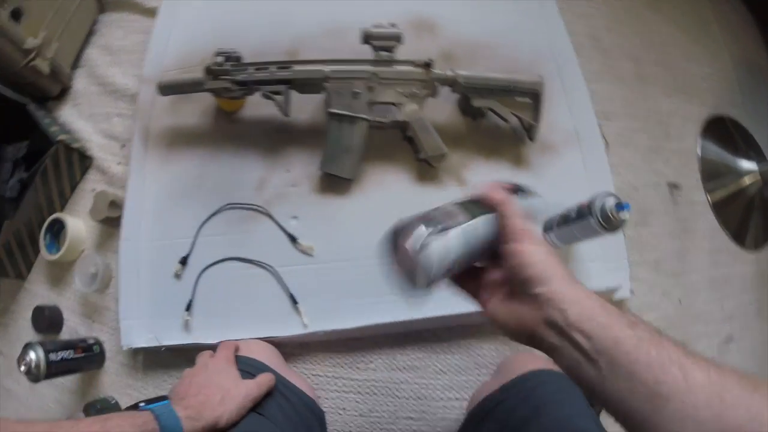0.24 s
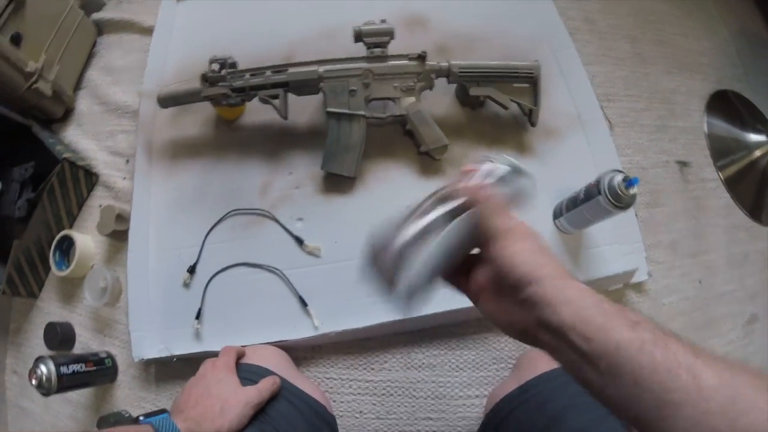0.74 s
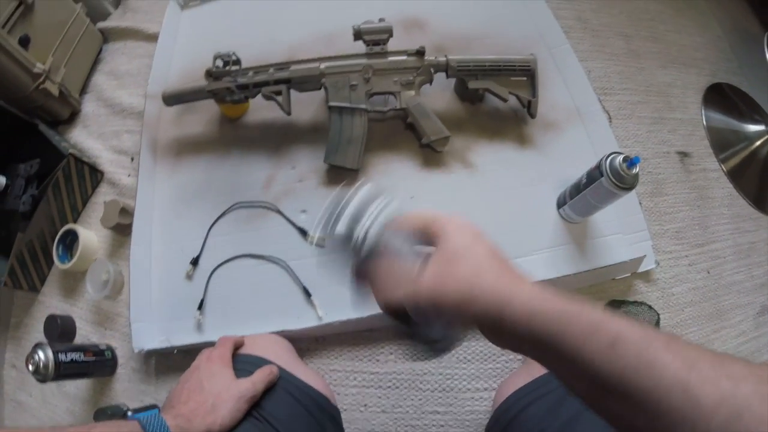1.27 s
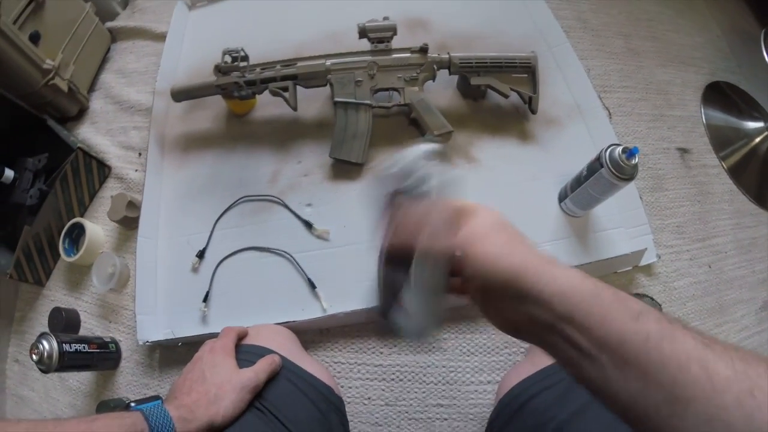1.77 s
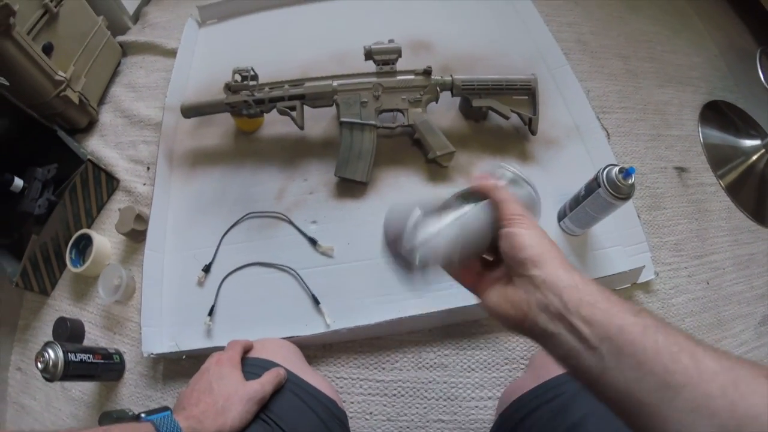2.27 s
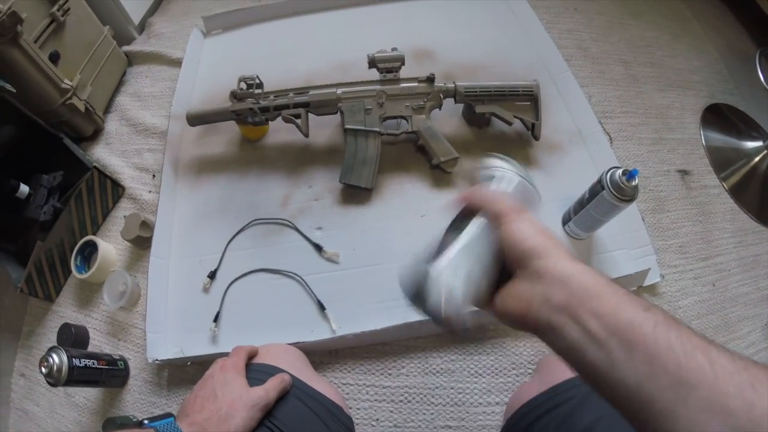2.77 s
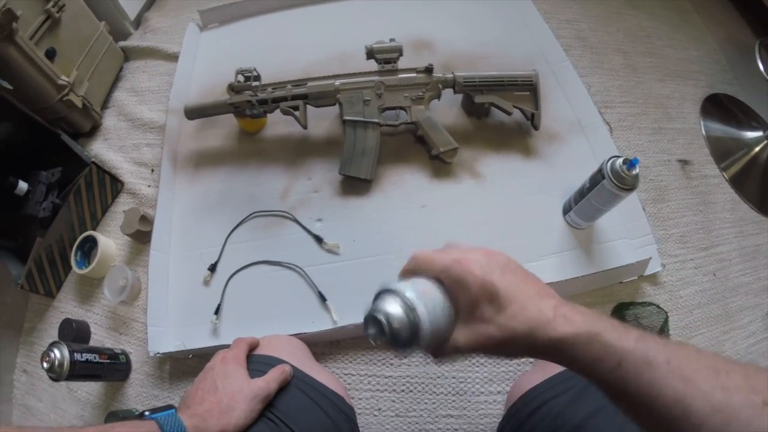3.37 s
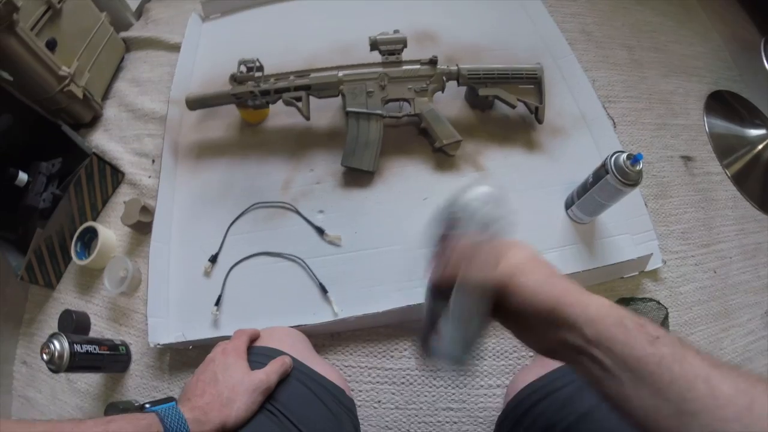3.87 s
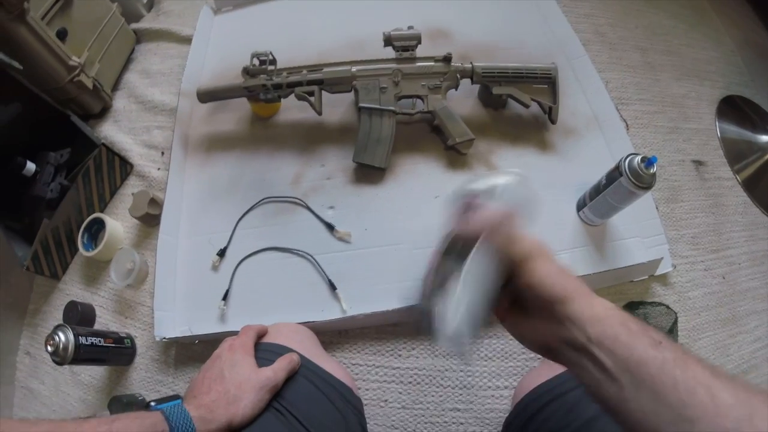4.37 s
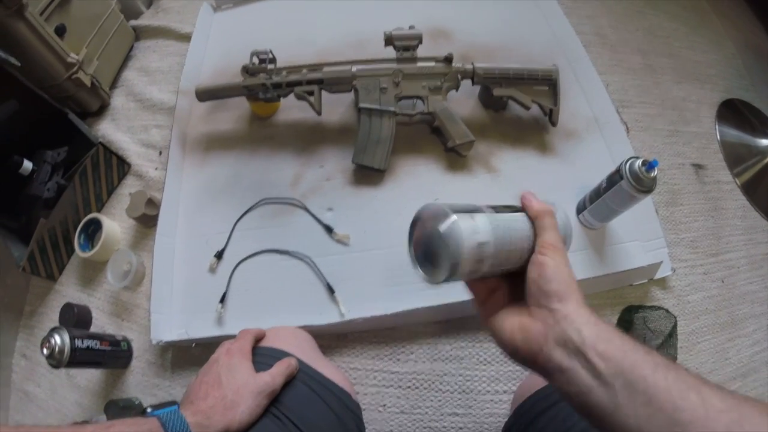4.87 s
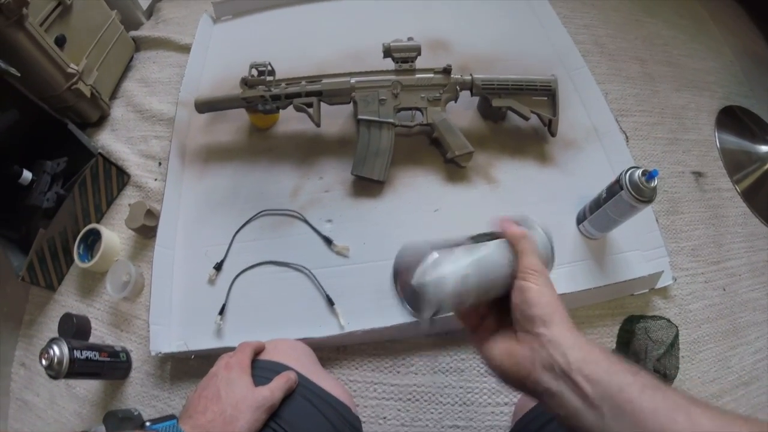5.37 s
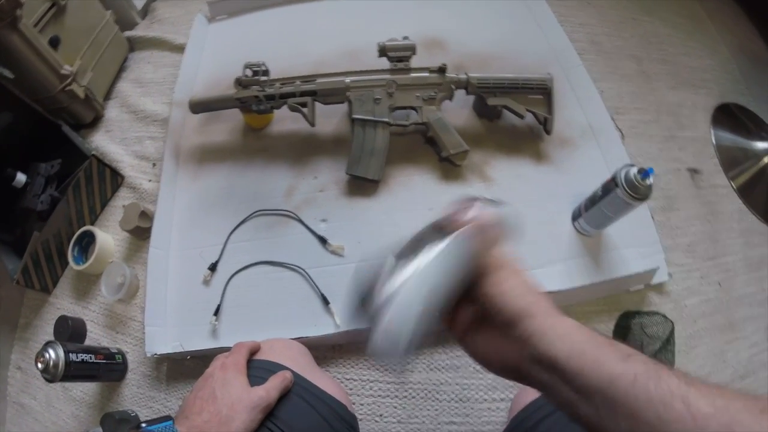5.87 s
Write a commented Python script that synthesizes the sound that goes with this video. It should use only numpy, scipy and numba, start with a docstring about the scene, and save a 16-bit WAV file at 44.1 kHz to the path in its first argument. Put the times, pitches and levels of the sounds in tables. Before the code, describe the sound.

A half-full spray can is shaken hard by hand in a carpeted room, an arm's length from a small camera microphone, both channels the same. Throughout, a mixing ball strikes thin steel with short, dry metallic knocks, while paint sloshes and fizzes softly between them. It opens with a quick cluster, a brief gap from about 0.2 to 0.45 seconds, then a busy mix of hollow tocks and bright clacks. From about 1.2 to 3.5 seconds the rattle is nearly continuous, dense and hard, mostly high and wall-like. From 3.6 it thins; between 4 and 5 come separate sharp clacks with lower little bounces after them. A short pause, with only slosh, falls around 5.1 to 5.3, then hollower, lower knocks return, thickening from 5.75 to the end just past 6 seconds. Short, dull room tails and faint hush remain beneath, with little bass.

```python
"""In a carpeted room, a half-full spray can is shaken hard by hand, an arm's length from a small camera.
The mixing ball knocks on the steel: bursts of decaying modes, damped within milliseconds by hand and paint.
Paint sloshes and fizzes between knocks: drops and froth noise pushed through the can's modes.
The room adds short noise tails and a faint hush. One microphone feeds both channels."""
import sys
import numpy as np
from scipy import signal
from scipy.fft import rfft, irfft
from scipy.io import wavfile
from scipy.ndimage import uniform_filter1d
from numba import njit

SR = 44100
rng = np.random.default_rng(int(sys.argv[2]) if len(sys.argv) > 2 else 0)


def dump(signal):
    """Clip the signal to [-1, 1] and save it as 16-bit WAV at the path in sys.argv[1]."""
    limited = np.clip(np.atleast_2d(signal).T, -1, 1)
    pcm = np.round(limited * 32767).astype(np.int16)
    wavfile.write(sys.argv[1], SR, pcm)


N = 270774


def undb(db):
    """Decibels to amplitude gain."""
    return 10 ** (np.asarray(db) / 20)


def level(x, db):
    """Set the RMS level in dB."""
    return x * undb(db) / np.sqrt(np.mean(x ** 2))


def decay_60(t, t60):
    """Exponential decay, falling 60 dB in t60 seconds."""
    return np.exp(-np.log(1000) * t / t60)


def soft_start(t, rise_s):
    """Smooth swell from 0 to 1."""
    return 1 - np.exp(-(t / rise_s) ** 2)


def resonate(x, hz, width_hz):
    """Two-pole band-pass, gain 1 at the centre."""
    return signal.lfilter(*signal.iirpeak(hz, hz / width_hz, fs=SR), x)


def walk(rate):
    """Random levels held 1 / rate s and slewed twice; spread near 1."""
    hold = int(SR / rate)
    steps = np.repeat(rng.standard_normal(N // hold + 1), hold)
    return 2.04 * uniform_filter1d(uniform_filter1d(steps, hold), hold)[:N]


# How body, dome, wall, rim and tick follow a move toward the end, and a hard strike.
# One column per part: level change/dB per dB
FOLLOWS_END = [0.87, 0.97, -0.0076, -0.079, 0.24]
FOLLOWS_HARD = [0.025, 0.0013, -0.0081, 0.73, 1.06]


def shares(level_db, end_db, hard_db, part_db):
    """Share a level among the five parts of the can, in dB; their powers add up to that level."""
    db = np.array(part_db) + np.outer(end_db, FOLLOWS_END) + np.outer(hard_db, FOLLOWS_HARD)
    total_db = 10 * np.log10(np.sum(undb(db) ** 2, axis=1))
    return db + (level_db - total_db)[:, None]


# Spectrum of the room's hush, before its overall level is set.
# Columns: f/Hz, relative level/dB
HUSH_SPECTRUM = [(59, -62), (100, -18.5), (166, 2), (358, -27), (558, -5), (784, -33), (1580, -12.5),
                 (14400, -37), (16000, -50)]


def room_tone():
    """A faint steady hush: white noise shaped by a smooth spectrum."""
    hz, db = np.transpose(HUSH_SPECTRUM)
    f = np.maximum(np.fft.rfftfreq(N, 1 / SR), 1)
    gain = undb(np.interp(np.log(f), np.log(hz), db))
    return level(irfft(rfft(rng.standard_normal(N)) * gain, N), -50)


# Paint running along the can.
# Columns: t/s, wash level/dB, toward the end: dome over wall level/dB, spray: rim over wall level/dB
SLOSH = [(0, -34.5, 2, 7), (.12, -37, 3, -3), (.26, -31, -0.5, -2.5), (.45, -40, 3, 7),
         (.63, -29.5, 4.5, 3), (.85, -42.5, 5, 5), (1.02, -29.5, -5, -1), (1.13, -54, 2, 3),
         (1.4, -31, -9, -1), (1.74, -39.5, -2, -7), (2.2, -43.5, -6, 1), (2.7, -34, -8, -7),
         (3.2, -33.5, -12, -10), (3.45, -27, -13, -7), (3.6, -49, -9, -3), (3.78, -43, -2, -3),
         (3.93, -54, -6, 0), (4.3, -35, 4, 3.5), (4.9, -34.5, -0.5, 4.5), (5.15, -32.5, 0.5, 4),
         (5.25, -48, 3, 4), (5.58, -31.5, -3, 3), (5.8, -39, -1, 0), (6.14, -43, 12, 0)]
# Balance of the running wash; splash level under its knock.
# One column per part (body, dome, wall, rim, tick): level/dB
WASH_BALANCE = [-12.5, -0.5, -1.5, -9, -22]
SPLASH_UNDER_KNOCK = [-37.5, -36, -28.5, -31.5, -32.5]
SPLASH_RISE_S, SPLASH_T60_S = 0.026, 0.37


def stirring():
    """Gain of the paint on each part: the running wash plus the splash that follows every knock."""
    t = np.arange(N) / SR
    s, *columns = np.transpose(SLOSH)
    wash_db = shares(*(np.interp(t, s, c) for c in columns), WASH_BALANCE)
    wash_power = undb(wash_db.T) ** 2

    s, strength, end, hard, _ = np.transpose(KNOCKS)
    kick_db = shares(strength, end, hard, KNOCK_BALANCE) + SPLASH_UNDER_KNOCK
    kicks = np.zeros((len(CAN), N))
    kicks[:, np.clip(s * SR, 0, N - 1).astype(int)] = undb(kick_db.T) ** 2

    t = t[:SR // 2]
    # power falls 60 dB in the splash's t60
    splash = soft_start(t, SPLASH_RISE_S) * undb(-120 * t / SPLASH_T60_S)
    splash_power = np.abs(signal.fftconvolve(kicks, splash[None], axes=1)[:, :N])
    return np.sqrt(wash_power + splash_power)


# What the can rings with: one list of modes each for body, dome, wall, rim and tick.
# Columns: f/Hz, relative level within the part/dB, t60/s of the lingering ring
CAN = [
    [(252, 6, 0.0097), (397, 7.5, 0.011), (715, -3, 0.0031)],
    [(1017, -3, 0.011), (1400, -1, 0.012), (1625, -3.5, 0.024), (1865, -1, 0.019), (2168, -1, 0.017)],
    [(2723, 1.5, 0.0048), (3117, -1, 0.011), (3531, -0.5, 0.013), (4086, -0.5, 0.012), (4513, -1.5, 0.013)],
    [(5186, 5, 0.013), (6160, 6.5, 0.011), (6670, -4, 0.015), (7330, -4, 0.0083)],
    [(8310, -1, 0.0062), (9150, -1.5, 0.01), (10480, 0, 0.013), (11230, -20, 0.01), (12200, -6, .004),
     (13700, -7, 0.0028)],
]


def paint(drop_spread_db=3.0, hiss=0.69, wet_damping=4.66):
    """Drops and light scuffs of the ball tap the wall over a hiss of froth, through the can's modes."""
    drops_per_s, biggest_db, surge_db, patchy_db = 350, 10, 1.2, 2.5
    size_db = np.minimum(drop_spread_db * rng.exponential(size=N), biggest_db)
    falls = rng.random(N) < drops_per_s / SR
    drops = falls * undb(size_db) * np.sign(rng.standard_normal(N))
    surge = undb(surge_db * walk(59))
    out = 0
    for part, gain in zip(CAN, stirring()):
        push = level(drops, 0) + hiss * rng.standard_normal(N)
        wet = 0
        for f, db, t60 in part:
            # the moving paint muffles now one mode, now another
            patchy_gain = undb(db + patchy_db * walk(60))
            # wet steel rings shorter, so the bands are wider
            band = resonate(resonate(push, f, wet_damping / t60), f, 2 * wet_damping / t60)
            wet = wet + patchy_gain * band
        out = out + level(wet, 0) * gain * surge
    return out


# A blow favours the modes near its own pitch and pulls them toward it
FAVOUR_DB, FAVOUR_OCTAVES, PULL = 8.5, 0.21, 0.71


def ring(modes, chance, blow_hz, rise_s=0.00022, spread_s=.00012, linger=0.61):
    """One row per blow: the decaying modes of one part, struck at a new spot, peak 1."""
    hz, db, t60 = np.transpose(modes)[:, None, :, None]
    pitch, size, lag = (chance[:, k, :len(modes), None] for k in range(3))
    detune, scatter_db, snap_t60_s = .03, 2.5, .0055
    octaves = np.log2(blow_hz[:, None, None] / hz)
    near = np.exp(-(octaves / FAVOUR_OCTAVES) ** 2)
    hz = hz * 2 ** (PULL * near * octaves)
    hz = hz * (1 + detune * (1 - near) * pitch)
    db = db + FAVOUR_DB * near + scatter_db * size
    # the bending wave reaches each radiating patch a moment later
    t = np.maximum(np.arange(2048) / SR - spread_s * (1 - near) * np.abs(lag), 0)
    # most energy leaves in a snap around the contact; a share lingers in the shell
    decay = decay_60(t, snap_t60_s) + linger * decay_60(t, t60)
    # the favoured modes all start in the same direction
    direction = np.where(near > 1 / 4, 1, np.sign(lag))
    wave = direction * np.sin(2 * np.pi * hz * t) * decay
    sound = np.sum(undb(db) * wave * soft_start(t, rise_s), axis=1)
    return sound / np.max(np.abs(sound), axis=1, keepdims=True)


# Knocks of the mixing ball.
# Columns: t/s, strength level/dB, toward the end: dome over wall level/dB,
# hardness: rim over wall level/dB, favoured pitch f/Hz
KNOCKS = [(0.0515, -3, -6.5, -8, 3910), (0.076, -11.5, 0.5, 4, 4630), (0.0896, -14.5, -6, -7, 4670),
          (0.1443, -13, -2.5, -6, 3340), (0.163, -18.5, 5, -3, 1490), (0.4558, -0.5, -11, -2, 3000),
          (0.489, -29, 12, -3, 1530), (0.529, -6, 10, -2, 1710), (0.5486, -9, -1, -16, 1390),
          (0.5939, -4.5, -10.5, -8.5, 3850), (0.658, -12.5, -10, -22, 3350), (0.7044, -3.5, -6, -4.5, 1730),
          (0.708, -7, 9, 25, 2000), (0.7304, -7, 1, 3, 1730), (0.7521, -8, 1, -4, 4600),
          (0.7607, -7, -2, -15, 3390), (0.7755, -11.5, 4, -1, 1650), (0.8374, -7.5, 12, -5, 1820),
          (0.8487, -10, 6, -7, 1560), (0.8558, -17, 3, -5, 2050), (0.887, -5.5, -2, 2, 4550),
          (0.9021, -4, -0.5, -10, 4100), (0.979, -6.5, 1.5, -2, 4590), (1.0019, -2.5, -4, -10, 3500),
          (1.0059, -7.5, 9, 7.5, 1880), (1.0333, -6, 6, -9, 1980), (1.142, -13, 1.5, -11, 2120),
          (1.179, -3.5, -1.5, -4.5, 3230), (1.1872, -10.5, -6, -15, 2470), (1.2104, -9, -14, -12, 3250),
          (1.2185, -9.5, -15, -21, 3650), (1.2283, -1, -5.5, -7, 3460), (1.248, -5.5, -18, -22, 3570),
          (1.2703, -4, -13, -9, 3970), (1.2885, -3.5, -22, -13, 3550), (1.292, -5, -27, -16, 3320),
          (1.303, -11, -17, -11, 3300), (1.3111, -12, -15, -18, 3800), (1.335, -7.5, -12, -18, 2430),
          (1.343, -9, -16, -23, 3660), (1.3487, -10, -11, -20, 3800), (1.38, -8.5, -22, -9, 3400),
          (1.3931, -4.5, -11.5, -15, 3540), (1.4018, -3, -13, -22, 3400), (1.4424, -13, -6, -9, 3540),
          (1.451, -6.5, -7, -9, 3630), (1.4723, -9.5, 9, -9, 960), (1.4925, -15, 9, -10, 2080),
          (1.5153, -1, -19, -5.5, 3550), (1.5304, -4.5, -28, -26, 3870), (1.5376, -12, -9, -7, 3180),
          (1.5413, -7.5, -20, -8, 2820), (1.5833, -7, -20, -15, 3890), (1.5898, -4.5, -14.5, -13, 3380),
          (1.6439, -6, -13, -19, 3430), (1.6681, -7, -8, -12, 3510), (1.6896, -12, 11, -3, 1010),
          (1.7027, -12.5, 0, -6, 2020), (1.7096, -15, 3, -10, 1970), (1.7727, -2, -19.5, -11, 3460),
          (1.7768, -3, -12, -10.5, 3160), (1.7988, -7.5, -28, -10, 4520), (1.804, -9.5, -32, -11, 3440),
          (1.8391, -5, -15, -25, 4560), (1.8517, -12, -21, -15, 4560), (1.857, -8.5, -12, -22, 3450),
          (1.9029, -5, -11, -10, 3470), (1.9547, -6, -3.5, -6.5, 2870), (1.9985, -11.5, 3, -14, 2200),
          (2.0488, 1.5, -18, -9, 3100), (2.069, -20, -8, 3, 2590), (2.1233, -3, -14.5, -14, 3380),
          (2.1433, -5.5, -8.5, -17, 3630), (2.1656, -11.5, 0, -9, 970), (2.1798, -13.5, 0, -10, 1830),
          (2.2433, -8.5, 3, 0, 2800), (2.2583, -1.5, -24, -5.5, 3230), (2.2817, -4.5, -14.5, -15, 3070),
          (2.2895, -2, -17.5, -8, 3180), (2.3141, -12, -7.5, -7, 3170), (2.3373, -9.5, -14, -6, 3630),
          (2.3497, -10, -18, -16, 3540), (2.3538, -4.5, -11.5, -19, 3380), (2.3719, -9.5, -12, -25, 3750),
          (2.4179, -3, -0.5, -15, 3020), (2.4618, -2.5, -9, -18, 2640), (2.47, -7, -13, -21, 3400),
          (2.4807, -2, -22, -14, 3100), (2.4917, -14, -19, -18, 3060), (2.511, -6, -17, -13, 3060),
          (2.5217, -10, -13, -13, 2160), (2.5265, -11, -21, -11, 2870), (2.5342, -14, 0, -13, 1790),
          (2.5464, -2.5, -16, -26, 2920), (2.558, -13, -9, -6, 3990), (2.579, -1.5, -17, -13, 4530),
          (2.5884, -11, -15, -11, 3280), (2.5979, -8.5, -14, -9, 3670), (2.6387, -8.5, -7, -12, 3600),
          (2.662, -10.5, 5, -5, 2670), (2.7193, -3, -13.5, -8, 3260), (2.7252, -9, -22, -3, 3270),
          (2.73, -10, -17, -11, 3090), (2.7365, -6, -24, -12, 3000), (2.7572, -9, -8, -14, 3120),
          (2.7635, -7.5, -11, -14, 3200), (2.767, -6, -9, -16, 3120), (2.7851, -7, -22, -5, 4600),
          (2.8056, -3, -12.5, -14, 3640), (2.8135, -2.5, -18, -12, 3330), (2.8396, -11, -19, -11, 3400),
          (2.853, -9, -17, -10, 3620), (2.881, -10, -2, -14, 2890), (2.9092, -13.5, 0, -12, 2150),
          (2.9255, -12.5, 11, -11, 2200), (2.9358, -3.5, -17, -2, 4300), (2.9476, -0.5, -41, -20, 3460),
          (2.9527, -2.5, -19, -16, 2880), (2.96, -6.5, -15, -5, 2990), (3.018, -3, -22, -15, 3200),
          (3.0229, -6, -25, -22, 3810), (3.0598, -9, -19, -21, 3100), (3.077, -8, -12, -20, 3060),
          (3.1091, -7, -1, -11, 990), (3.1247, -7.5, 2, -8, 970), (3.1621, -4, -15, -7, 3340),
          (3.1677, 0.5, -21, -15, 3450), (3.1898, -8, -15.5, -18, 2950), (3.1958, -7, -8, -15, 3500),
          (3.2078, -12.5, 6, -18, 1740), (3.218, -5.5, -13, -25, 3140), (3.2442, -4.5, -10.5, -11, 3300),
          (3.265, -4, -17, -6, 3850), (3.2923, -20, -7, -21, 3150), (3.3382, -6, -7, -16, 2980),
          (3.347, -18, -12, -19, 3650), (3.3572, -8.5, 7, -4, 2080), (3.3923, -2, -11.5, 1.5, 2940),
          (3.4054, -6, -26, -20, 3230), (3.4105, -4.5, -5, -24, 3600), (3.4181, -12, -14, -23, 3400),
          (3.4252, -8.5, -25, -7, 2190), (3.4968, -13, -10, -11, 3110), (3.5524, -6.5, -14, -19, 3430),
          (3.6076, -6.5, 0.5, -7, 1578), (3.6287, -7, 5, -12, 1660), (3.6864, -0.5, -6.5, -20, 3080),
          (3.7038, -12, -6, -27, 3050), (3.753, -7, -10, -18, 3510), (3.768, -4, -13, -12, 4300),
          (3.7781, -6.5, -11, -13, 4070), (3.7935, -8, -3, -10, 2270), (3.8505, -4.5, 4, -11, 1860),
          (3.9725, -1.5, -17.5, -3.5, 4520), (4.0121, -12.5, -5, -21, 2670), (4.0317, -8.5, -5, -10, 3694),
          (4.0466, -13, -6, -10, 3540), (4.1097, 2.5, -23, 0.5, 3483), (4.1338, -11.5, -15, -13, 3680),
          (4.1388, -2, -15, -11, 3300), (4.2093, -16, 1, -13, 1520), (4.2297, -4.5, -22, 0, 4150),
          (4.245, -13.5, -4, -10, 1380), (4.2572, -16, 6, -6, 1730), (4.3437, -2, -10.5, -7.5, 2330),
          (4.3644, -11, 2, -10, 1480), (4.3786, -10.5, 4, -11, 1360), (4.4737, -4, -14, -1.5, 5900),
          (4.4927, -11, 0, -4, 2200), (4.5087, -11, -3, -10, 2060), (4.5277, -14.5, 12, -10, 1440),
          (4.581, -2, -11, -7.5, 2760), (4.6019, -9.5, 1, -12, 1360), (4.6131, -12, 0, -13, 1400),
          (4.699, -1, -15, -4.5, 4300), (4.7206, -10.5, 1, -5, 1560), (4.772, -18, -4, -6, 4500),
          (4.7906, -4.5, -12.5, -21, 3710), (4.8003, -5, -5, -6, 2690), (4.811, -5.5, 0, -9, 4360),
          (4.956, -3, -14, -0.5, 6010), (5.0452, -1, -10, -11.5, 2900), (5.061, -15, -4, -6, 2930),
          (5.3088, -3, 7, -7, 1700), (5.3523, -8, 3, -5, 1510), (5.379, 1.5, -20.5, -5.5, 3400),
          (5.396, -16, -10, -14, 4250), (5.4215, -7, -17, -3, 4640), (5.4319, -9, -17, -16, 4200),
          (5.5066, -2, -6, -6.5, 1730), (5.5319, -14.5, 13, -10, 1550), (5.5573, -4.5, 0, -7, 1370),
          (5.571, -9.5, 2, -14, 1430), (5.6793, -3.5, -15.5, 0, 3420), (5.6936, -16, 14, 5, 1080),
          (5.7492, -5.5, -3.5, -12, 1760), (5.7627, -11.5, 12, -6, 1960), (5.7901, -4, -7.5, -6, 2270),
          (5.819, -4.5, 0.5, -14, 1913), (5.8405, -6.5, -1, -4, 1520), (5.8625, -10.5, 1, -1, 1310),
          (5.9046, -5, -1.5, 3, 2070), (5.9124, -6.5, -4, -6, 3070), (5.9416, -2.5, -2, 3, 3670),
          (5.9706, -13, 0, -18, 1320), (6.0151, -7.5, 4, -11, 1660), (6.032, -8, 1, -5, 1630),
          (6.0453, -18, -10, -1, 1610), (6.0572, -4, -4.5, 0.5, 4360), (6.092, -3.5, 4, -8, 1380),
          (6.1218, -6.5, -4, -9, 1400)]
# Balance of a knock, and the spread of its chance changes.
# One column per part (body, dome, wall, rim, tick): level/dB
KNOCK_BALANCE = [-13, 0, -1, -4, -10]
KNOCK_SCATTER = [2, 1, 0, 1.5, 1.5]


def ball(lead_s=.0003, count=6):
    """Each knock rings the parts in its own mix; rows are positions of the moving can in the room, in turn."""
    s, strength, end, hard, blow_hz = np.transpose(KNOCKS)
    out = np.zeros((count, N + 2048))
    chance = rng.standard_normal((len(s), len(CAN), 4, 6))
    part_db = shares(strength, end, hard, KNOCK_BALANCE) + chance[:, :, 3, 0] * KNOCK_SCATTER
    blows = 0
    for k, part in enumerate(CAN):
        blows = blows + undb(part_db[:, [k]]) * ring(part, chance[:, k], blow_hz)
    for k, (at, blow) in enumerate(zip(s, blows)):
        i = int(np.clip((at - lead_s) * SR, 0, N - 1))
        out[k % count, i:i + 2048] += blow
    return out[:, :N]


ROOM_T60_S, ROOM_DB = 0.26, -13.5


def room(positions, gap_s=0.0054, dull_hz=5000):
    """Carpet and walls return a short, duller wash, swelling in softly, different for each can position."""
    t = np.arange(SR // 2) / SR
    noise = rng.standard_normal((len(positions), len(t)))
    tails = noise * decay_60(t, ROOM_T60_S) * soft_start(t, gap_s)
    tails = signal.sosfilt(signal.butter(1, dull_hz, fs=SR, output="sos"), tails)
    # the wash is fuller where the dome and the wall of the can hum
    tails = tails + 0.64 * resonate(tails, 1850, 340) + 0.18 * resonate(tails, 3700, 930)
    tails = tails / np.sqrt(np.sum(tails ** 2, axis=1, keepdims=True))
    return undb(ROOM_DB) * np.sum(signal.fftconvolve(positions, tails, axes=1), axis=0)[:N]


def scene():
    """Mix knocks, their room wash, paint and hush, the same in both channels."""
    knocks = ball()
    mono = np.sum(knocks, axis=0) + room(knocks) + paint() + room_tone()
    return np.array([mono, mono])


@njit
def follow(x, attack, release):
    """Level follower with separate rise and fall."""
    out, e = np.empty(len(x)), 0.
    for i in range(len(x)):
        e += (abs(x[i]) - e) * (attack if abs(x[i]) > e else release)
        out[i] = e
    return out


LOW_CUT_HZ, TOP_HZ, PREAMP_DB = 139, 16300, -70
LIMIT_DB, LIMIT_RATIO, LIMIT_ATTACK_S, LIMIT_RELEASE_S = -16.5, 1.18, 0.0042, 0.013


def record(dry):
    """The camera cuts the bass steeply, ducks loud knocks, adds low noise, clips and rolls off the top."""
    x = signal.sosfilt(signal.ellip(10, .5, 50, LOW_CUT_HZ, "highpass", fs=SR, output="sos"), dry)
    loud = follow(x[0], 1 / (LIMIT_ATTACK_S * SR), 1 / (LIMIT_RELEASE_S * SR))
    x = x * np.maximum(loud / undb(LIMIT_DB), 1) ** (1 / LIMIT_RATIO - 1)
    # preamp noise, low-passed at 60 Hz
    noise = signal.sosfilt(signal.butter(1, 60, fs=SR, output="sos"), rng.standard_normal(N))
    x = np.clip(x + level(noise, PREAMP_DB), -1, 1)
    x = signal.sosfilt(signal.butter(6, 14000, fs=SR, output="sos"), x)
    return signal.sosfilt(signal.ellip(10, .2, 80, TOP_HZ, fs=SR, output="sos"), x)


dry = scene()
out = record(dry)
dump(out)
```